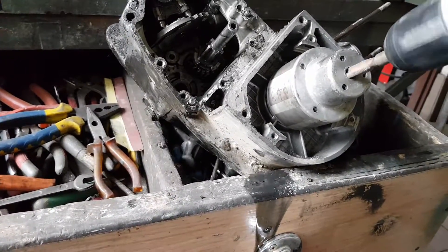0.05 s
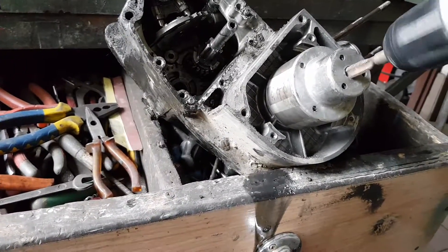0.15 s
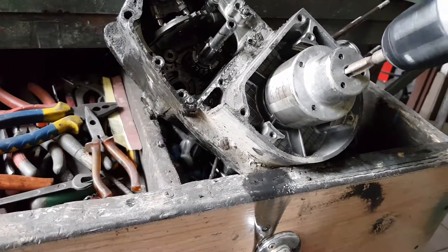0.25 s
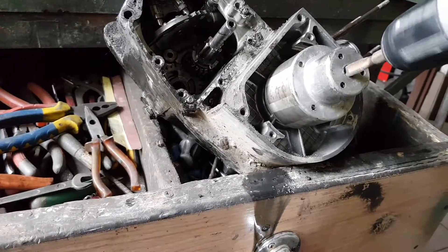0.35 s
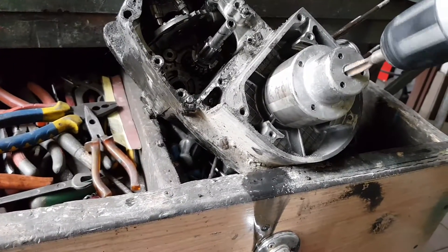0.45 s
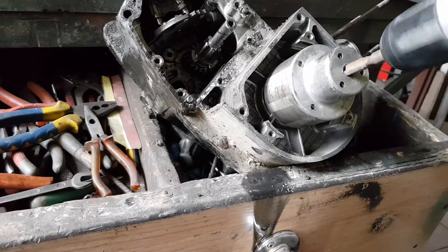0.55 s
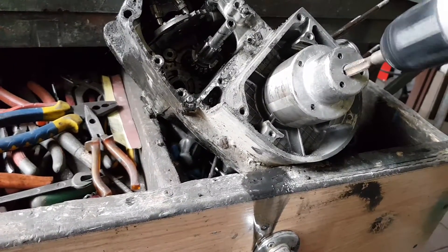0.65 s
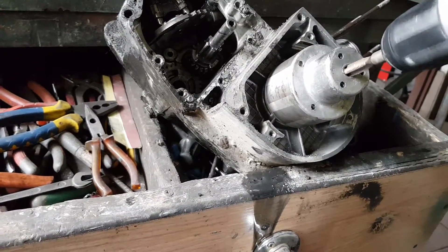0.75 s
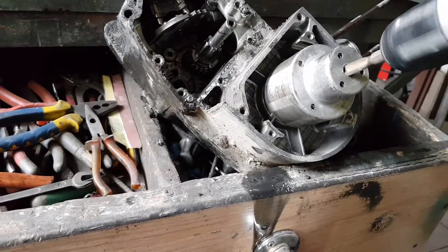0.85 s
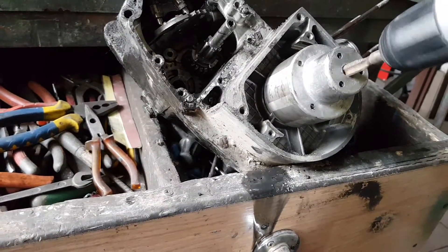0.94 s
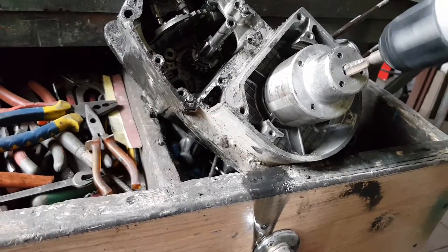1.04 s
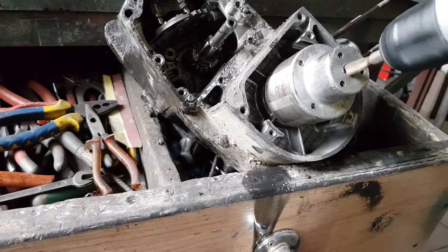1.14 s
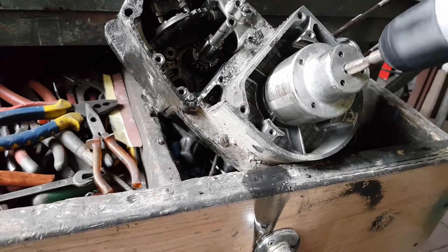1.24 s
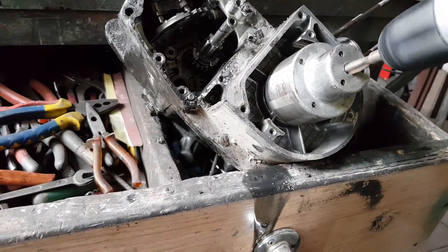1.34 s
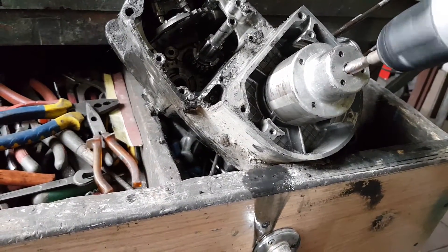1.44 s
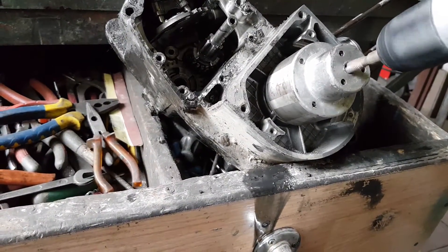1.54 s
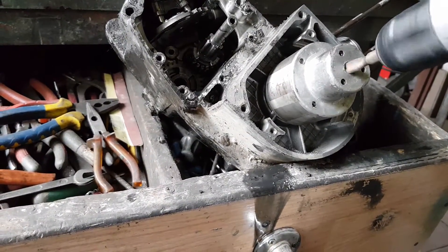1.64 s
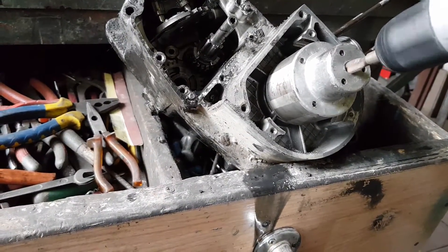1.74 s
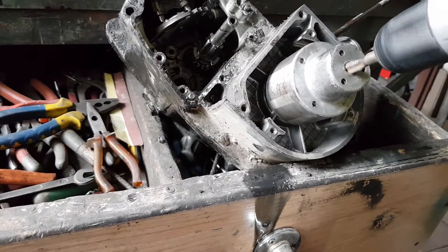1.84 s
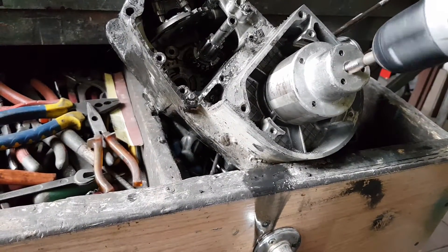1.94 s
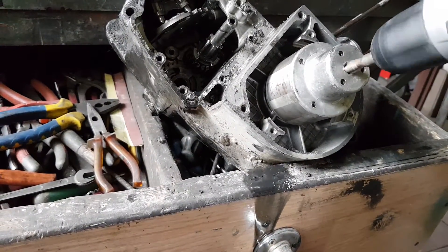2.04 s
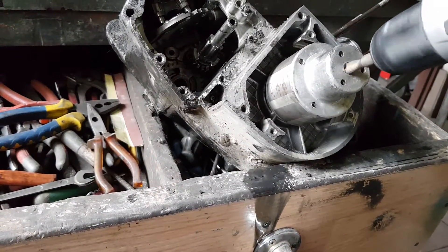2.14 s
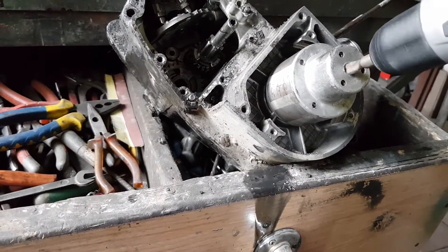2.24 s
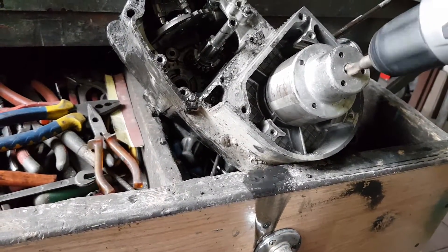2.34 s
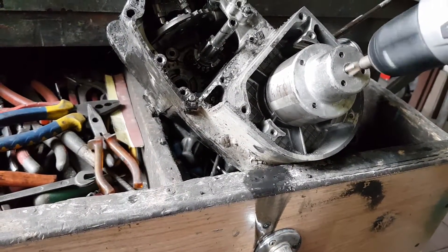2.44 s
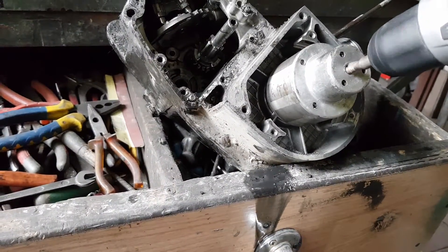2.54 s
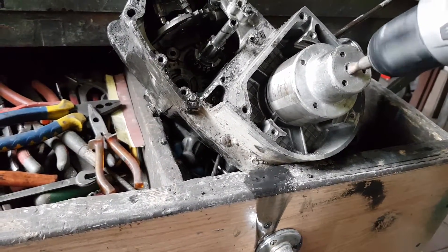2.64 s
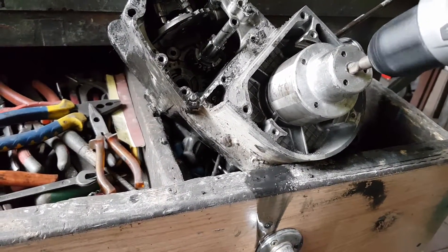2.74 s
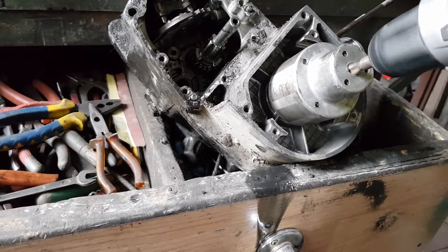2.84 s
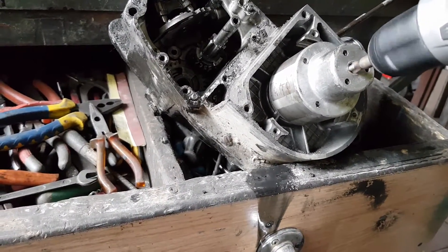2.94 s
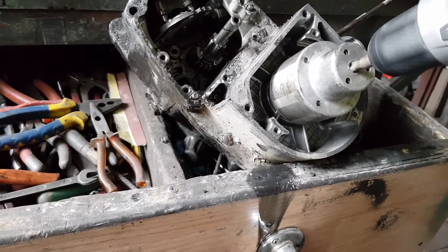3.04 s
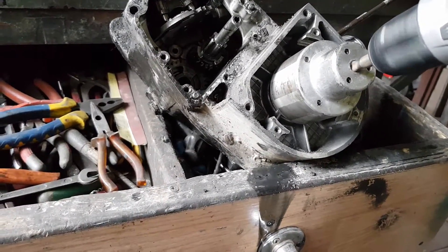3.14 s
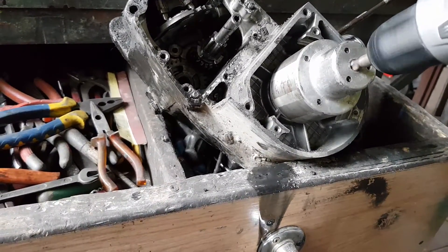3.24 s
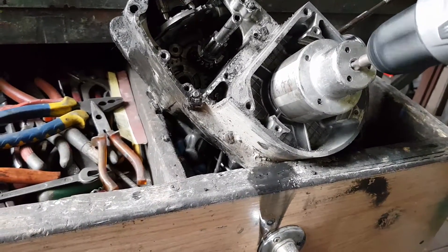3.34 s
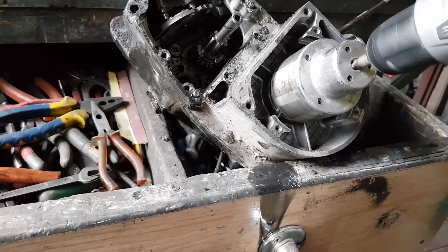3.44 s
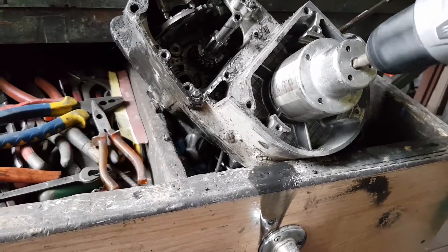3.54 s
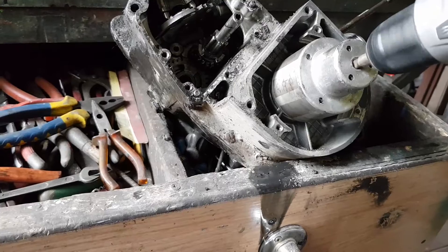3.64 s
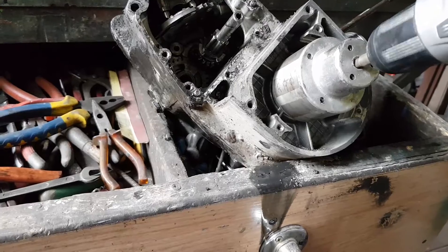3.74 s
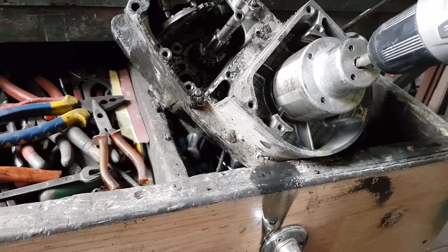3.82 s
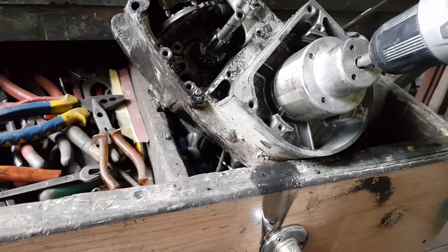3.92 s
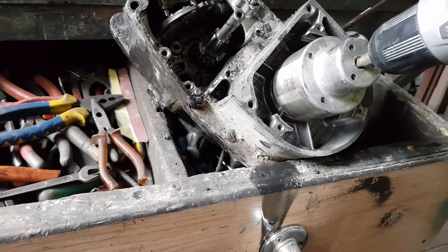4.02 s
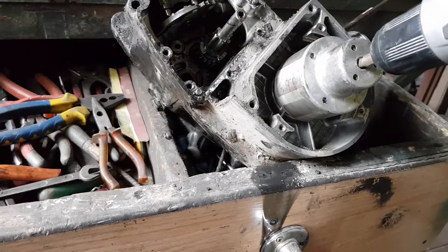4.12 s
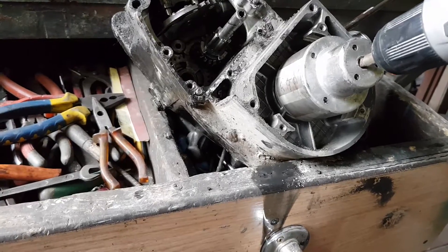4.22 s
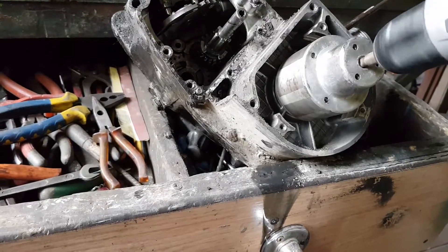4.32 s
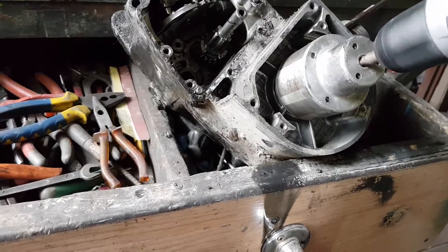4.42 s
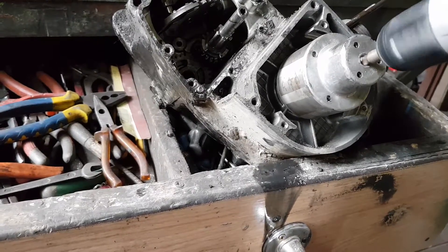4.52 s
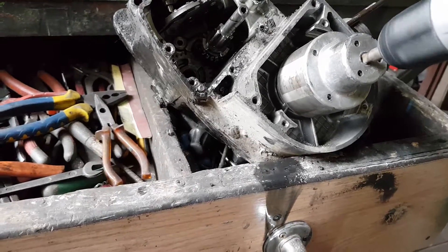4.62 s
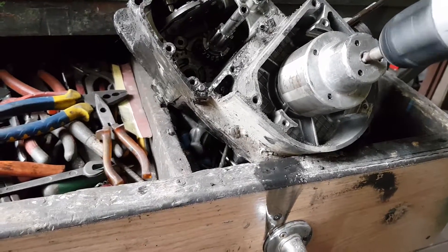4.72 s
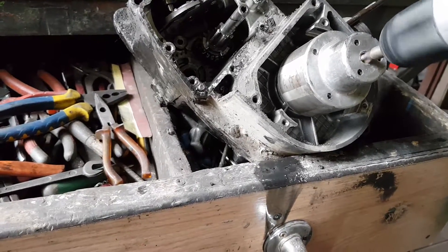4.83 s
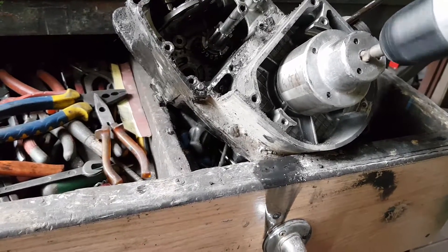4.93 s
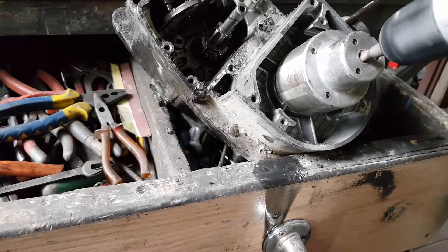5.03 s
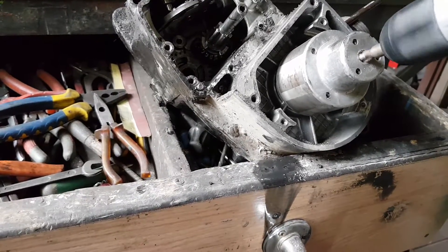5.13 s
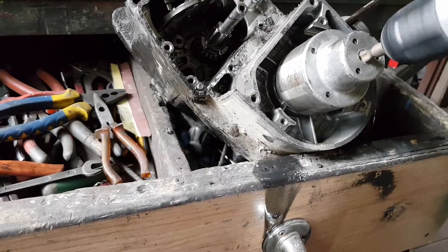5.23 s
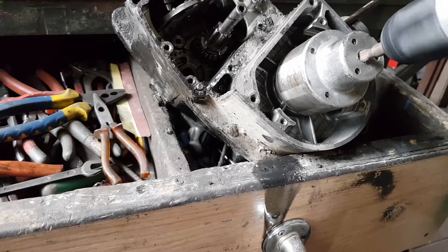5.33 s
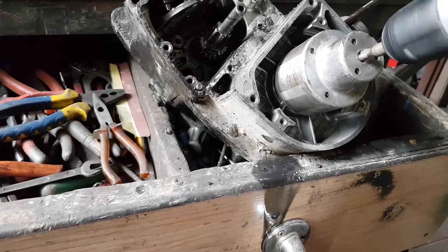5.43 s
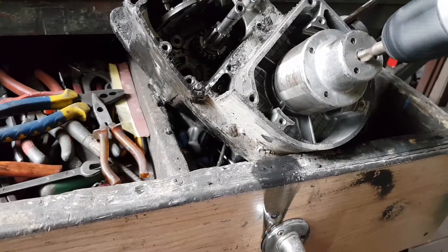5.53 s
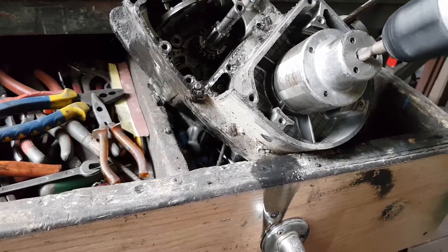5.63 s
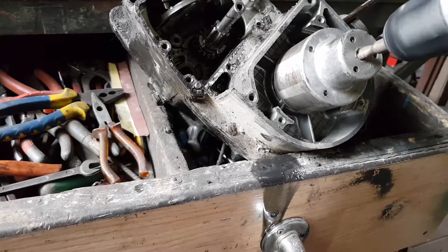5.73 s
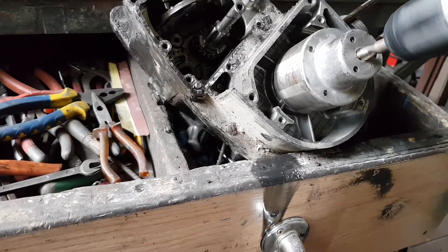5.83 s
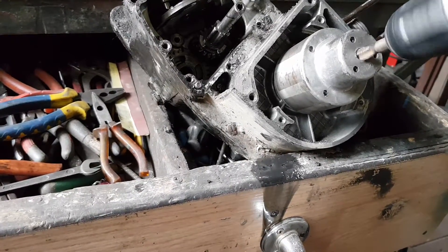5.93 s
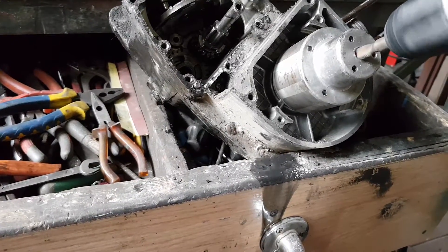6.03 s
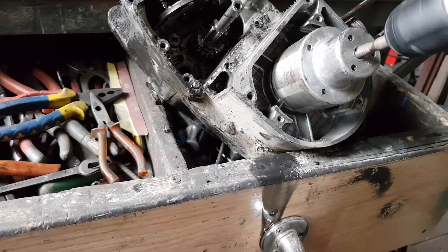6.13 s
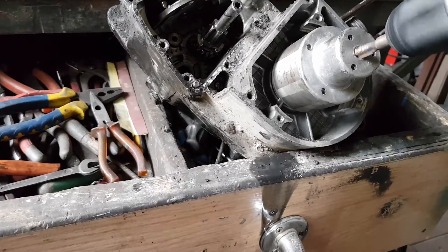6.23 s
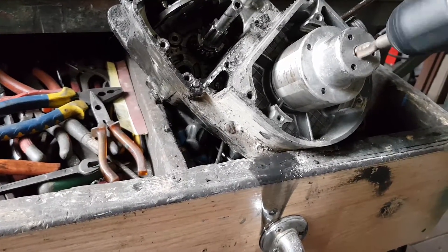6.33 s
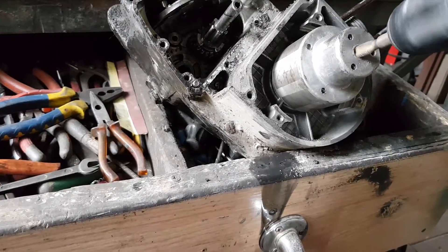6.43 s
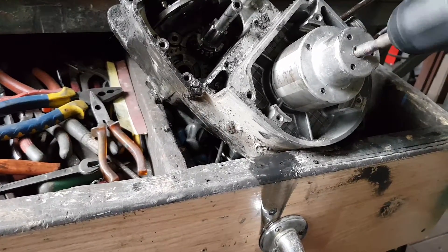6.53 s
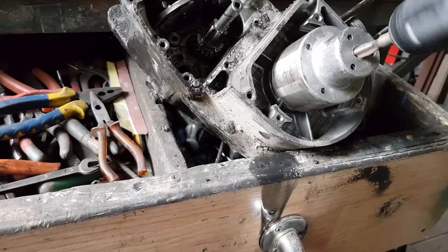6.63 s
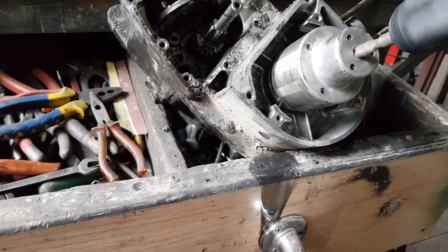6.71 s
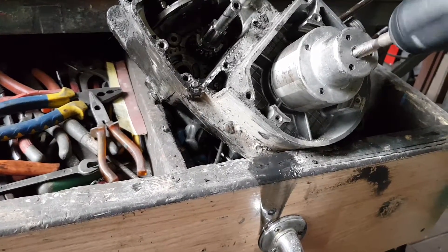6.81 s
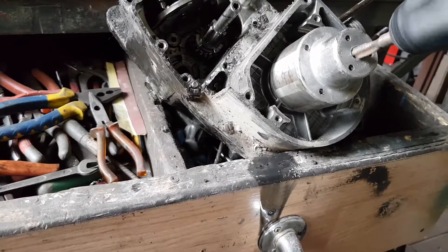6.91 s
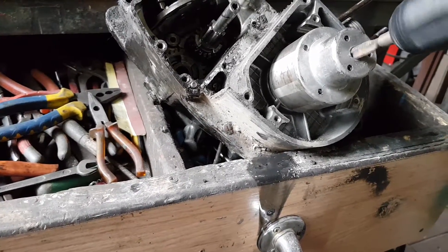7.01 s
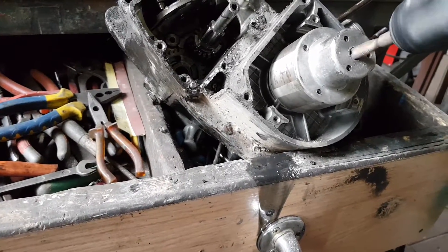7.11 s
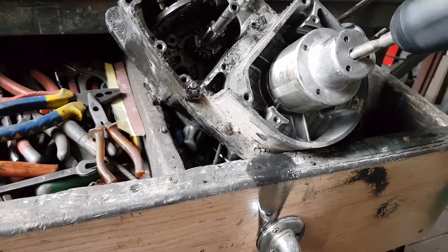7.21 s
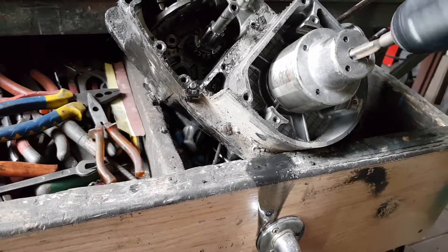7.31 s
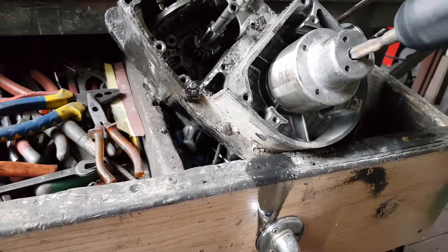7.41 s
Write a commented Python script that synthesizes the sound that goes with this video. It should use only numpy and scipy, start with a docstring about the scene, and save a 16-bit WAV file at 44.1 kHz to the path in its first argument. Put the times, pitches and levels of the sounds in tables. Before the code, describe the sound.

A cordless drill creeps with a rough gear rattle, speeds to a whine, stops, clacks into reverse, then backs out whirring brightly and ever more evenly.

```python
"""On a workbench in a quiet workshop, close to the microphones, a cordless drill taps a cast engine part.
It creeps, speeds up as the tap bites, stops, clacks into reverse and backs out, wavering under load
at first, then running freer. Noisy gear strikes ring the housing; sine orders of the motor speed whine;
the planet gears hum. The tap squeaks in short gliding tones; chuck, trigger and reversing switch knock in
decaying noise bursts; going forward the motor fan buffets the right microphone with gusting noise bands."""
import sys
import numpy as np
from scipy import signal
from scipy.fft import rfft, irfft
from scipy.io import wavfile
from scipy.ndimage import uniform_filter1d, minimum_filter1d

SR = 44100
rng = np.random.default_rng(int(sys.argv[2]) if len(sys.argv) > 2 else 0)


def digitize_waveform(pressure):
    """Quantize a signal to 16-bit integers and store it at the path in sys.argv[1].

    Rows of a 2-D input are taken as channels; values are limited to [-1, 1].
    """
    field = np.atleast_2d(pressure).T
    bounded = np.clip(field, -1, 1)
    quanta = np.round(bounded * 32767).astype(np.int16)
    wavfile.write(sys.argv[1], SR, quanta)


N = 329206
TIME = np.arange(N) / SR
BINS = np.maximum(np.arange(N // 2 + 1) * SR / N, 1)  # Hz

# grip of the thread on the tap: (time [s], load [0-1])
LOAD = [(1.2, 0.88), (2.4, 0.46), (3.6, 0.82), (4.4, 0.3), (5.5, 0.47), (5.95, 0), (7.4, 0.03)]
# moves of the trigger: (time [s], share of full speed aimed at [0-1], lag of the motor [s])
TRIGGER = [(.84, .615, .135), (1.135, 1, .042), (3.64, .77, .06), (3.76, 0, .12), (4.22, 1, .042)]
CREEP_SHARE = .326  # of full speed
RELEASE_S, ENGAGE_S = 3.752, 4.265  # gears let go, gears take hold again


def amp(db):
    """Decibels to gain."""
    return 10 ** (np.asarray(db) / 20)


def curves(rows):
    """Each column of a table, joined by straight lines in time."""
    s, *columns = np.transpose(rows)
    return [np.interp(TIME, s, column) for column in columns]


def unit(x):
    """Scale to rms 1."""
    return x / np.sqrt(np.mean(x ** 2))


def colour(x, gain):
    """Filter by a gain per frequency."""
    return irfft(rfft(x) * gain, N)


def contour(points):
    """Gain per frequency from (Hz, dB) points, straight over log frequency."""
    hz, db = np.transpose(points)
    return amp(np.interp(np.log(BINS), np.log(hz), db))


def resonances(modes, low_hz):
    """Causal (minimum-phase) response of a body with these modes; it radiates little below low_hz."""
    power = sum(amp(db) ** 2 / (1 + ((BINS ** 2 - hz ** 2) / (BINS * width_hz)) ** 2)
                for hz, width_hz, db in modes)
    radiated = power / (1 + (low_hz / BINS) ** 2)
    cepstrum = irfft(np.log(radiated + 1e-9) / 2, N)
    return np.exp(rfft(2 * cepstrum[:N // 2], N) - cepstrum[0])


def walk(rate_hz):
    """Smooth random wander with rms 1."""
    steps = rng.standard_normal(N // 8)
    size = max(int(SR / rate_hz), 1)
    wander = np.interp(np.arange(N) / size, np.arange(len(steps)), steps)
    return unit(uniform_filter1d(wander, size))


def echoes(x, t60_s, wet_db):
    """Add dense reflections from bench and walls, different at each microphone."""
    t = TIME[:SR // 2]
    tail = rng.standard_normal((2, len(t))) * amp(-60 * t / t60_s) * (t > .001)
    tail /= np.sqrt(np.sum(tail ** 2, axis=1, keepdims=True))
    wet = signal.fftconvolve(x, tail, axes=1)[:, :N]
    return (x + amp(wet_db) * wet) / np.hypot(1, amp(wet_db))


def ports(x):
    """The drill is on the right: the left microphone hears it later and duller."""
    # the left microphone faces away: (frequency [Hz], gain [dB])
    shade = [(100, -0.5), (600, -8.5), (1200, -3.5), (2400, -6), (3600, -7.5), (4400, -6.5), (6400, -8.5),
             (7800, -8), (8700, -9.5), (10500, -8.5), (12500, -17), (15500, -11.5)]
    delay_samples = 16
    left, right = np.broadcast_to(x, (2, N))
    late = np.exp(-2j * np.pi * BINS * delay_samples / SR)
    return np.array([colour(left, contour(shade) * late), right])


def trigger():
    """Share of full speed: the motor settles exponentially towards each new position of the trigger."""
    share = np.full(N, CREEP_SHARE)
    for s, aim, lag_s in TRIGGER:
        settling = aim + (np.interp(s, TIME, share) - aim) * np.exp(-np.abs(TIME - s) / lag_s)
        share = np.where(TIME < s, share, settling)
    return share


def drive():
    """How firmly the gears are driven, 0-1: hold, collapse with a faint coasting tail, attack."""
    fall_db_per_s, rise_db_per_s = 452.5, 640
    coast_db, coast_db_per_s = -25.5, 118
    since_s = np.maximum(TIME - RELEASE_S, 0)
    dying = amp(-fall_db_per_s * since_s) + amp(coast_db - coast_db_per_s * since_s)
    attack = amp(-rise_db_per_s * np.clip(ENGAGE_S - TIME, 0, 1))
    return np.minimum(dying + attack, 1)


def workshop(floor_db=-62):
    """Faint rush of the room: coloured noise, separate at each microphone, drifting slightly in level."""
    # spectrum of the quiet workshop: (frequency [Hz], density [dB per Hz])
    shop = [(30, -8.5), (90, 5), (250, -9.5), (480, -6), (750, -18.5), (1050, -7), (1250, 1.5), (1550, -7),
            (1900, -13), (3300, -13), (8000, -21.5), (16000, -35.5)]
    rush = unit(colour(rng.standard_normal((2, N)), contour(shop)))
    return rush * amp(floor_db + walk(6.5))


def draught(share, corner_hz=205, growth=0.66, steepness=5.32, low_hz=78, gain_db=2.5, top_hz=340):
    """Fan air thumps the right microphone: pressure goes with speed squared, stronger gusts sound higher."""
    # how the stream leaves the microphone as the drill advances: (time [s], level [dB])
    fan_aim = [(0, -2.5), (.9, 0.5), (1.3, -2), (2.1, -7), (2.4, -10.5), (2.7, -16), (3.3, -17),
               (3.7, -21.5)]
    # single puffs: (time [s], length [s], rise over the stream [dB])
    puffs = [(0.156, 0.036, 3), (.47, 0.036, 3.5), (0.959, 0.017, 4.5), (2.023, 0.031, 4.5),
             (2.555, .06, 1), (2.645, 0.016, 6), (2.832, 0.013, 9), (3.052, 0.08, 7.5), (3.193, 0.018, 6.5),
             (3.296, 0.026, 3), (3.665, 0.051, 6.5), (3.79, 0.018, 16)]
    # eddies in the stream: (rate [1/s], depth [dB])
    eddies = [(30, 4.6), (11, 2.2)]
    fan_db = -16  # at full speed, before aim, gusts and gain_db
    eddies_db = 0
    for rate_hz, depth_db in eddies:
        flutter = colour(rng.standard_normal(N), 1 / (1 + (BINS / rate_hz - rate_hz / BINS) ** 2))
        eddies_db = eddies_db + depth_db * np.tanh(unit(flutter))
    puffs_db = sum(db * np.exp(-2 * ((TIME - s) / length_s) ** 2) for s, length_s, db in puffs)
    air_db = fan_db + 20 * np.log10(share ** 2) + curves(fan_aim)[0] + puffs_db + eddies_db
    corner = np.minimum(corner_hz * amp(growth * (air_db + 23)), top_hz)
    air = 0
    for hz in 30 * 2 ** (np.arange(12) / 2):  # half-octave bands
        band = unit(colour(rng.standard_normal(N), 1 / (1 + (2 * np.log2(BINS / hz)) ** 4)))
        air = air + band * np.sqrt(hz / corner / (1 + (hz / corner) ** steepness))
    # in reverse the fan blows elsewhere
    forward = TIME < TRIGGER[-1][0]
    # the microphone passes little deep bass
    bass_cut = 1 / (1 - 1j * low_hz / BINS) ** 2
    return colour(air * forward * amp(air_db + gain_db), bass_cut) * amp([[-34], [0]])


def knocks():
    """Chuck, trigger and reversing switch knock: decaying noise bursts ring shared modes."""
    # knocks: (time [s], force [dB], decay [s])
    blows = [(1.15, -17, .02), (3.795, -41, 0.00305), (3.887, -42.5, 0.0024), (4.079, -46.5, 0.0018),
             (4.156, -16, 0.0042), (4.159, -6, 0.0022), (4.163, -27.5, 0.05), (4.231, -37, 0.016),
             (4.285, -6, 0.0018)]
    # what they ring with: (frequency [Hz], width [Hz], level [dB])
    ring_modes = [(425, 200, -15.5), (1130, 290, -8), (1510, 300, 2), (2320, 360, -3), (3930, 260, 7.5),
                  (4597, 150, 4.5), (7450, 1800, -11), (12500, 5400, -16)]
    force = sum(amp(db) * (TIME >= s) * np.exp(-np.abs(TIME - s) / decay_s) for s, db, decay_s in blows)
    ring = resonances(ring_modes, 293.3)
    ring /= np.sqrt(np.mean(np.abs(ring) ** 2))
    return echoes(ports(colour(force * rng.standard_normal(N), ring)), .22, -14)


def squeaks():
    """The tap sticks and slips for a few milliseconds; the shrill tone lingers in the metal and the room."""
    # squeaks: (time [s], length [s], start [Hz], end [Hz], right peak before echoes [dB], left over right [dB])
    chirps = [(0.929, 0.04, 3470, 3570, -26, 8), (2.469, 0.0083, 11150, 10700, 0.5, -11),
              (2.479, 0.014, 11120, 10950, 4, -10.5), (2.642, 0.024, 10280, 11320, -2, -7),
              (5.49, 0.032, 10470, 10750, -12.5, 3.5), (5.51, 0.0077, 11100, 10830, 3, -22),
              (5.663, 0.014, 11700, 11750, -15.5, 1), (5.834, 0.0073, 9620, 10270, -4.5, -12),
              (5.904, 0.0052, 9510, 9050, -26, -3)]
    out = np.zeros((2, N))
    tremble_rad = .35 * walk(700)
    for s, length_s, start_hz, end_hz, db, left_db in chirps:
        part = np.clip((TIME - s) / length_s, 0, 1)
        phase = 2 * np.pi * np.cumsum(start_hz + (end_hz - start_hz) * part) / SR
        swell = np.sqrt(4 * part * (1 - part))
        out += swell * np.sin(phase + tremble_rad) * amp([[db + left_db], [db]])
    return echoes(out, .22, -7)


def planets(turns, speed, free_db=-57, loaded_db=-41.5, forward_db=-7):
    """The planet gears hum at two thirds of the motor speed, most when they pull under load in reverse."""
    pulling = np.clip(curves(LOAD)[0] / .45, 0, 1)
    hum = np.sin(2 * np.pi * turns * 2 / 3 + walk(30) / 2) * np.clip(speed / 300, 0, 1) ** 3
    hum_db = free_db + (loaded_db - free_db) * pulling + forward_db * (TIME < RELEASE_S)
    return hum * drive() * amp(hum_db + 1.5 * walk(25)) * amp([[0], [-1]])


def whine(turns, whine_db, share, left_db=-4, slowing_db=-14, creep_db=-20, run_up_db=-5,
          run_up_shake=.005):
    """Motor and gear orders, faint when slow, rough in run-up; load reweights them and trembles the speed."""
    # whine beside the twelfth order: (multiple of motor speed, under load [dB], running free [dB])
    orders = [(1, -26, -22), (2, -16, -28), (3, -27, -26), (5, -26, -21), (6, -26, -21), (10, -8, -17),
              (12, 0, 0), (15, -15, -22), (17, -14, -28), (20, -9, -23), (21, -21, -17), (22.5, -11, -15),
              (24, -17, -15), (28, -24, -19), (32, -17, -19), (34, -21, -12), (35, -8, -16), (36, -2, -24),
              (37, -4, -26), (43, -22, -10), (45, -14, -10), (46, -9, -22), (49, -15, -19), (50, -9, -14)]
    load = np.clip(curves(LOAD)[0], 0, 1)
    run_up = np.tanh(np.maximum(np.gradient(share, TIME), 0) / 3)
    creeping = np.clip((.45 - share) / (.45 - CREEP_SHARE), 0, 1)
    tremble_turns = .0014 * (.5 + load) * walk(70)
    shake_turns = run_up_shake * run_up * walk(300)
    angle = 2 * np.pi * (turns + tremble_turns + shake_turns)
    mesh_db = whine_db + slowing_db * (1 - share) + creep_db * creeping + run_up_db * run_up
    tones = 0
    for order, loaded_db, free_db in orders:
        flicker_db = 1.3 * (.5 + load) * walk(25)
        db = mesh_db + free_db + load * (loaded_db - free_db) + flicker_db
        tones = tones + np.sqrt(2) * amp(db) * np.sin(order * angle + rng.uniform(0, 2 * np.pi))
    return ports(tones * drive()) * amp([[left_db], [0]])


def teeth(turns, scatter_db=2.0, slide_db=2):
    """Twelve teeth a turn strike with uneven force, over the noise of their sliding."""
    strikes = np.diff(np.floor(12 * turns), prepend=0) * rng.standard_normal(N)
    strikes = unit(strikes * amp(scatter_db * rng.standard_normal(N)))
    return unit(strikes + amp(slide_db) * rng.standard_normal(N))


def rattle(turns, speed, own_db=0.0, pulse=0.065, flutter_db=0.62, casting_db=-3.5, thrum_db=-29.5,
           body_db=-5.0, slow_body_db=-5.5, clatter_db=3, slow_clatter_db=-1.7,
           sizzle_db=2.07, slow_sizzle_db=1.5, reverse_sizzle_db=1.3, dulling=0.38):
    """Gear contacts ring the housing; each microphone hears some in common and some of its own."""
    # rattle while the motor drives, going in and backing out: (time [s], level [dB])
    rattle_in = [(0, -30.5), (.3, -27.5), (.8, -30.5), (.95, -24), (1.25, -22.5), (1.7, -26), (2.43, -26),
                 (2.62, -29), (3.72, -30.5)]
    rattle_out = [(4.3, -25), (4.43, -23.5), (5.4, -23), (5.87, -27.5), (6.99, -27), (7.02, -26),
                  (7.44, -24)]
    # gearbox, shell and casting: (frequency [Hz], width [Hz], level [dB])
    housing_modes = [(273, 270, -15.5), (930, 263, -9.5), (1603, 130, -4.5), (2415, 1900, -12),
                     (3010, 250, -0.5), (3475, 280, 1.5), (4204, 670, 6), (5600, 200, 6), (6445, 900, 3.5),
                     (7360, 560, 1), (8570, 620, -3), (11120, 1340, -3), (12340, 880, -6), (12450, 710, -1),
                     (15000, 2100, -14)]
    # the casting rings out at low speed: (frequency [Hz], width [Hz], level [dB])
    casting_modes = [(1047, 60, -4), (1250, 80, -16), (1515, 43, -6.5), (2517, 45, -2), (3150, 200, -0.5),
                     (4290, 213, 2.5), (6320, 120, -6), (7000, 110, 3)]
    bench_modes = [(100, 28, -11.5), (620, 97, 1.5), (955, 110, -8.5)]  # same columns
    gear_ratio, first_scrape_s, scrape_db = 16, .17, 2.0

    level_db, = curves(np.vstack([rattle_in, rattle_out]))
    driven = drive()
    slow = np.clip((220 - speed) / 80, 0, 1)  # 0 from 220 turns/s up, 1 below 140
    force = teeth(turns) + amp(own_db) * np.array([teeth(turns), teeth(turns)])
    # the torque ripples twice a turn, and the gears chatter
    force *= (1 + pulse * np.sin(4 * np.pi * turns)) * amp(flutter_db * walk(55))
    # at low speed the tap scrapes once per turn of the chuck
    chuck_turns = (turns - np.interp(first_scrape_s, TIME, turns)) / gear_ratio
    scrape = amp(scrape_db * slow * np.cos(2 * np.pi * chuck_turns))

    housing = ports(colour(force, resonances(housing_modes, 110)))
    low = 1 / (1 + (BINS / 2500) ** 8)
    high = 1 / (1 + (10000 / BINS) ** 12)
    body = amp(body_db + slow_body_db * slow) * unit(colour(housing, low))
    clatter = amp(clatter_db + slow_clatter_db * slow) * unit(colour(housing, 1 - low - high))
    treble_db = sizzle_db + slow_sizzle_db * slow * driven + reverse_sizzle_db * (TIME > RELEASE_S)
    sizzle = amp(treble_db) * unit(colour(housing, high))
    casting = slow * amp(casting_db) * unit(ports(colour(force, resonances(casting_modes, 900))))
    # the bench top thrums under the casting
    thrum = amp(thrum_db) * unit(colour(force, resonances(bench_modes, 60)))
    # coasting gears sound duller
    bright = (driven + 1e-9) ** dulling
    sound = scrape * (body / bright + clatter + casting) + sizzle * bright + thrum
    return echoes(sound * driven * amp(level_db), .2, -15)


def scene():
    """The trigger sets the motor speed, which drives rattle, whine, hum and fan."""
    # motor speed at full trigger, going in and backing out: (time [s], speed [turns/s])
    speed_in = [(1.35, 320.5), (1.7, 319.9), (2.1, 316.9), (2.5, 312.9), (3.1, 309.3), (3.55, 311)]
    speed_out = [(4.42, 294.2), (4.7, 296.8), (5.05, 295.2), (5.42, 299.5), (5.65, 298), (5.97, 304),
                 (6.7, 303.6), (7.45, 306.8)]
    # the gear whine fades as the tap goes in and grows as it backs out: (time [s], level [dB])
    whine_level = [(1.3, -23), (1.7, -24.5), (2.4, -30.5), (3.0, -36.5), (3.7, -40), (4.3, -27.5),
                   (5.5, -27), (6.2, -25.5), (7.45, -21.5)]
    share = trigger()
    full_speed, = curves(np.vstack([speed_in, speed_out]))
    speed = share * full_speed
    # backing out through the fresh thread, the speed wavers with the load (share of speed)
    waver = .0005 + .003 * curves(LOAD)[0] * (TIME > RELEASE_S)
    turns = np.cumsum(speed * (1 + waver * walk(12))) / SR
    surroundings = workshop() + draught(share)
    drill = knocks() + planets(turns, speed) + whine(turns, curves(whine_level)[0], share)
    return surroundings + squeaks() + drill + rattle(turns, speed)


def record(dry):
    """A limiter ducks each channel around the loudest peaks; the recorder cuts the top."""
    ceiling, hold_s, top_hz = .93, .012, 15800
    hold = int(hold_s * SR)
    gain = np.minimum(1, ceiling / (np.abs(dry) + 1e-9))
    gain = uniform_filter1d(minimum_filter1d(gain, hold, axis=1), hold, axis=1)
    top_cut = signal.ellip(12, .1, 80, top_hz, fs=SR, output="sos")
    return signal.sosfilt(top_cut, dry * gain)


dry = scene()
out = record(dry)
digitize_waveform(out)
```